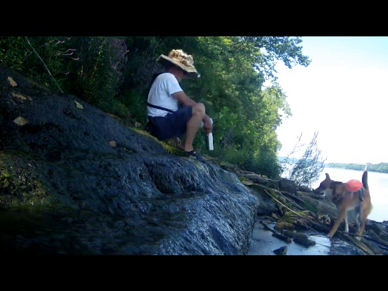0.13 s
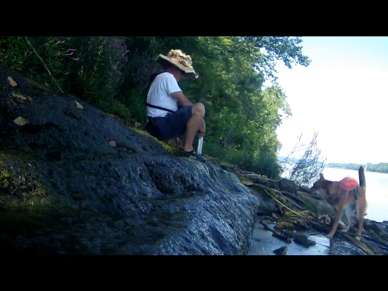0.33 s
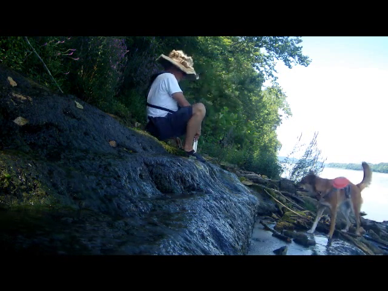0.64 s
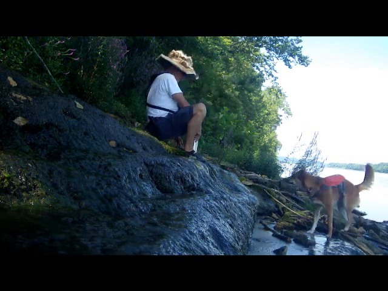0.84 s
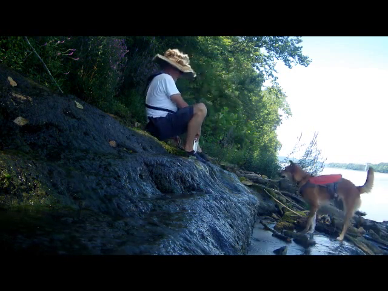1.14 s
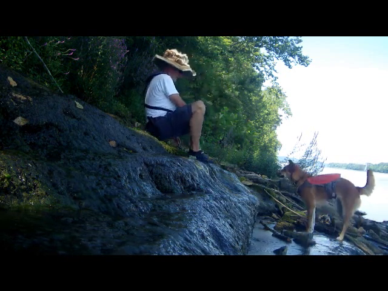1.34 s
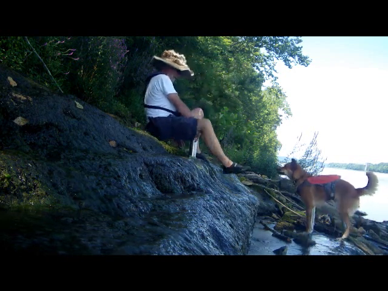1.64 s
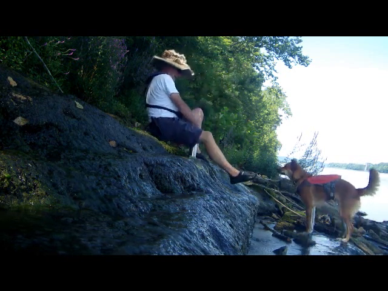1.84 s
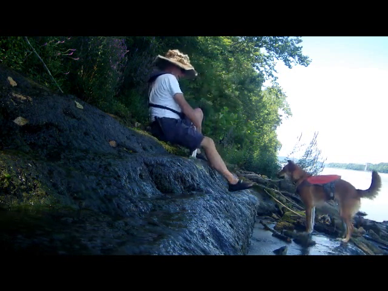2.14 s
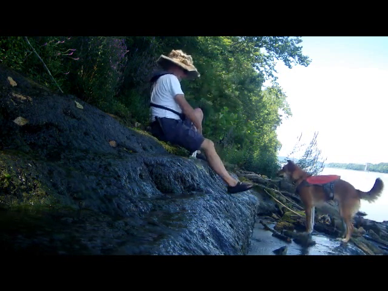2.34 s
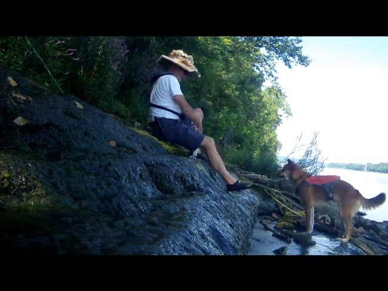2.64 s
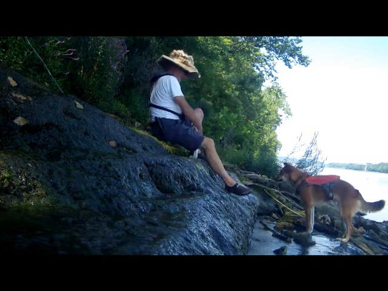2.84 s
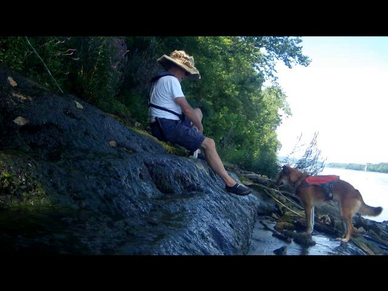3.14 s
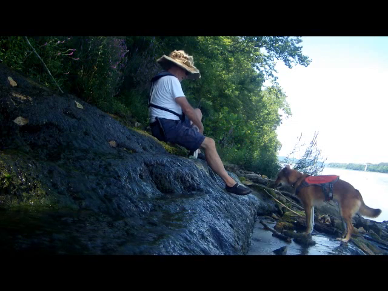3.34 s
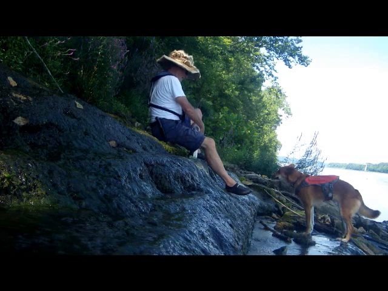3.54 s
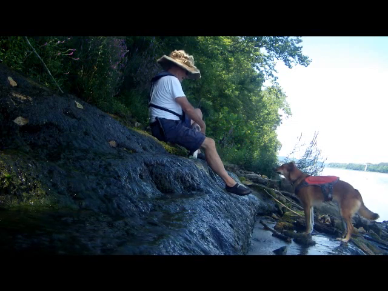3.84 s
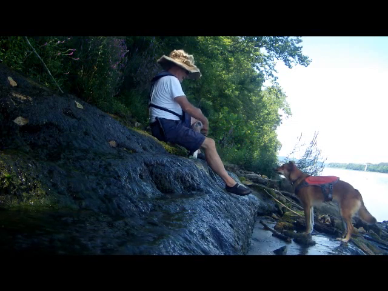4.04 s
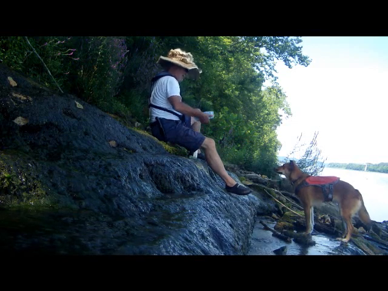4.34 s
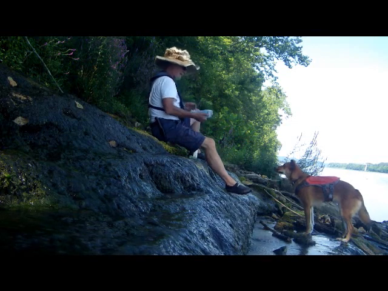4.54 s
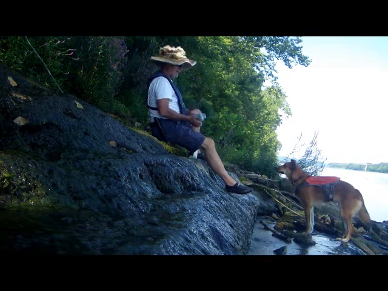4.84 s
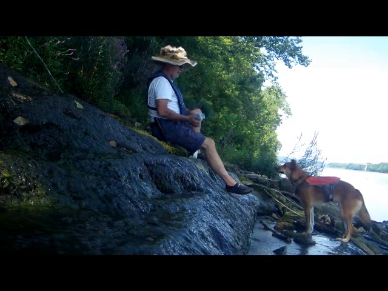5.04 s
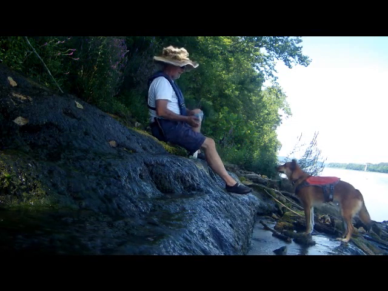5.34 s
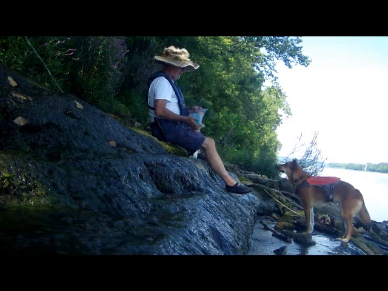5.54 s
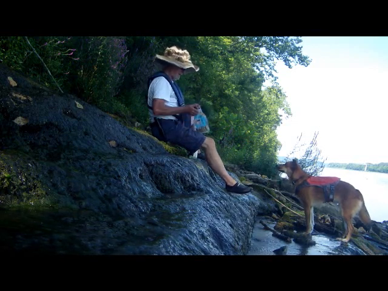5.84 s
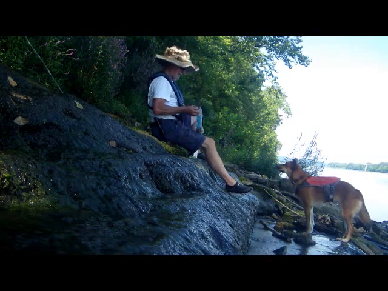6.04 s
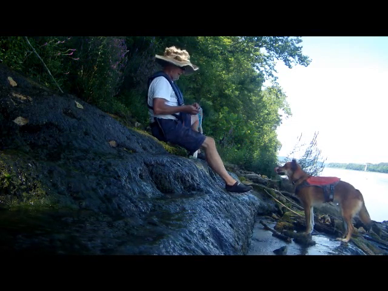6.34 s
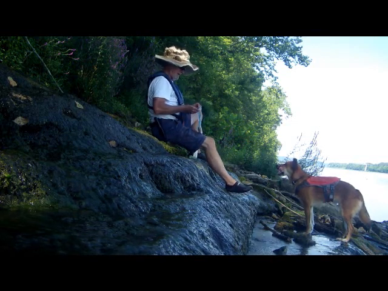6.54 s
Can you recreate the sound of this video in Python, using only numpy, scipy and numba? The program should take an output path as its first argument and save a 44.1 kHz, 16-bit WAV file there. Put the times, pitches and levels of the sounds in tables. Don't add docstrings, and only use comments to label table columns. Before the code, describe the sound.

Outdoors by a rock ledge, water keeps flowing with a crisp, flickering fizz and fine burble. Irregular single drops snap and ring at high pitch, mid-pitched bubbles gurgle, low bloops sit faintly underneath, and a few drops knock on stone. Some hits late on are the loudest and slightly clipped, pushing the flow down before it swells back. Small enclosed microphone, coloured and resonant, with little deep bass.

```python
import sys
import numpy as np
from scipy import signal
from scipy.fft import rfft, irfft
from scipy.io import wavfile
from scipy.ndimage import uniform_filter1d
from numba import njit

SR = 44100
rng = np.random.default_rng(int(sys.argv[2]) if len(sys.argv) > 2 else 0)


def level_to_linear(level):
    exponent = np.asarray(level, float) / 20
    return 10 ** exponent


def master_out(mix):
    frames = np.transpose(np.atleast_2d(mix))
    ceiling = np.clip(frames, -1, 1)
    pcm = np.round(ceiling * 32767).astype(np.int16)
    wavfile.write(sys.argv[1], SR, pcm)


N = 295470
T = np.arange(N) / SR
CASE_HZ = np.fft.rfftfreq(8192, 1 / SR)


def unit(x):
    return x / np.sqrt(np.mean(x ** 2))


def case_db():
    # f/Hz, level/dB
    broad_points = [(12, -64), (20, -41), (104, -38), (166, -37), (283, -34), (537, -13.5), (887, -27),
                    (1470, -0.5), (2560, -13.5), (3680, -10), (4470, -7.5), (6250, -9), (8980, -25.5),
                    (14000, -26.5), (15700, -27)]
    # f/Hz, width/Hz, level/dB
    ripples = [(162.3, 40, 6.5), (1993, 105, 3.5), (3660, 160, 1), (3710, 306, -4.5), (4780, 63, -9.5),
               (5855, 450, -5), (6270, 120, 3), (6560, 116, -7), (9810, 310, 4), (15100, 610, -9),
               (12960, 1900, -5.5), (1480, 300, 2.5), (15750, 400, -9)]
    # f/Hz, width/Hz, level/dB
    thin_notches = [(7418, 45, -16), (14835, 60, -9)]
    points_hz, points_db = np.transpose(broad_points)
    broad = np.interp(np.log(CASE_HZ + 1), np.log(points_hz), points_db)
    response = uniform_filter1d(broad, size=5)
    for group in (ripples, thin_notches):
        for hz, width_hz, db in group:
            response = response + db / (1 + (2 * (CASE_HZ - hz) / width_hz) ** 2)
    return response


def case(x):
    cepstrum = irfft(case_db() * np.log(10) / 20)
    cepstrum[1:4096] *= 2
    cepstrum[4097:] = 0
    response = irfft(np.exp(rfft(cepstrum)))
    return signal.fftconvolve(x, response)[:N]


def gain_db():
    # t/s, step down/dB
    overloads = [(0.106, 0.5), (0.34, 5.5), (0.781, 1.5), (1.175, 4), (1.265, 4), (1.676, 1.5), (2.153, 4),
                 (2.382, 6), (2.86, 4), (3.195, 2.5), (3.413, 0.5), (3.438, 2), (3.618, 3), (3.917, 4.5),
                 (4.121, 1), (4.138, 4), (4.603, 3), (4.835, 1.5), (4.848, 3), (5.234, 3), (5.314, 3.5),
                 (5.52, 8), (5.866, 6.5)]
    recovery_db_per_s = 14.5
    out = np.zeros(N)
    for s, step_db in overloads:
        i = int(s * SR)
        climbing = out[i] - step_db + recovery_db_per_s * (T[i:] - s)
        out[i:] = np.minimum(climbing, 0)
    return uniform_filter1d(out, size=60, origin=29)


@njit
def ring(start, hz, cycles, size, glide):
    out = np.zeros(N)
    for k in range(len(start)):
        period = SR / hz[k]
        phase = 0.
        for i in range(min(int(2 * cycles[k] * period), N - start[k])):
            age = 3 * i / period / cycles[k]
            phase += 2 * np.pi * (1 + glide[k] * age / 3) / period
            envelope = (age * np.exp(1 - age)) ** 1.5
            out[start[k] + i] += size[k] * envelope * np.sin(phase)
    return out


def walk(rate):
    k = int(SR / rate)
    levels = rng.standard_normal(N // 100)[:N // k + 1]
    slewed = uniform_filter1d(uniform_filter1d(np.repeat(levels, k), k), k)[:N]
    drift = uniform_filter1d(slewed, size=int(.11 * SR))
    return unit(slewed - drift)


def spray(shared_db, own_db):
    spectrum = rfft(rng.standard_normal(N))
    hz = np.fft.rfftfreq(N, 1 / SR)
    surge = walk(20) + 0.63 * walk(45)
    out = 0
    for octave in range(4, 15):
        share = np.cos(np.pi / 2 * np.clip(np.log2(hz + 1) - octave, -1, 1)) ** 2
        depth = np.clip((octave - 5.5) / 6, .1, 1.1)
        flicker_db = depth * (shared_db * surge + own_db * walk(30))
        out = out + irfft(spectrum * share, N) * level_to_linear(flicker_db)
    return unit(out)


def bubbles(count, low_hz, high_hz, cycles, spread_db, glide):
    when, pitch, luck, length = rng.random((count, 4)).T
    start = (when * N).astype(np.int64)
    hz = low_hz * (high_hz / low_hz) ** pitch
    size = hz / high_hz * level_to_linear(spread_db * np.minimum(-np.log(luck), 3.5))
    return unit(ring(start, hz, cycles * (.5 + length), size, glide * length))


def trickle():
    # t/s, level/dB
    flow = [(0, 0.5), (.25, -1.5), (.4, 2.1), (.7, 2.5), (.9, -1), (1.35, 4.5), (1.9, 0), (2.55, 3),
            (2.8, 0.5), (3.4, 2), (3.75, 0), (4.1, 3.5), (4.3, 1), (4.75, -0.5), (5.05, 1), (5.6, 1.5),
            (6.2, 3), (6.7, 1)]
    fizz = bubbles(count=20000, low_hz=2474, high_hz=12860, cycles=6.5, spread_db=4.5, glide=0.14)
    burble = bubbles(count=3000, low_hz=297.4, high_hz=2636, cycles=11.56, spread_db=2.0, glide=0.241)
    patter = bubbles(count=700, low_hz=1500, high_hz=6300, cycles=2.3, spread_db=-3.0, glide=0.17)
    water = spray(shared_db=0.74, own_db=0.32)
    water = water + level_to_linear(-4.0) * fizz + level_to_linear(-13.5) * burble + level_to_linear(-19.5) * patter
    water_db = -21 + np.interp(T, *np.transpose(flow))
    return unit(case(water)) * level_to_linear(water_db)


def lasting(table, *rest):
    return np.array([tuple(row) + rest for row in table], float)


def drops(table, glide):
    s, db, hz, cycles = np.transpose(table)
    swell_s = .0005
    start = ((s + swell_s) * SR).astype(np.int64)
    colour_db = np.interp(hz, CASE_HZ, uniform_filter1d(case_db(), size=60))
    size = level_to_linear(db - gain_db()[start] - colour_db)
    return ring(start, np.minimum(hz, 14000), np.clip(cycles, 1, 40), size, np.full(len(s), glide))


def bloops():
    # t/s, peak level as heard/dB, f/Hz
    low_bubbles = [(.711, -37, 530), (.797, -36, 538), (.985, -34.5, 540), (1.974, -35, 650),
                   (2.11, -34, 560), (3.16, -35.5, 520), (3.352, -35, 490), (3.54, -35, 600),
                   (4.65, -42, 487), (5.16, -34, 540), (5.944, -35, 570), (6.278, -37.5, 470),
                   (6.484, -29.5, 553)]
    return drops(lasting(low_bubbles, 8.6), glide=0.22)


def risers():
    # t/s, peak level as heard/dB, f/Hz, length/cycles
    climbers = [
        (0.52, -50, 614, 13),
        (1.293, -33.5, 660, 17),
        (1.37, -36, 700, 12),
        (6.54, -33, 983, 15.7),
    ]
    return drops(climbers, glide=0.524)


def gurgles():
    # t/s, peak level as heard/dB, f/Hz
    gurgling = [(.0147, -12.5, 1490), (.5395, -14, 1730), (.7736, -10.5, 1500), (1.172, -12, 1500),
                (1.3588, -18, 1500), (1.452, -15, 1500), (1.4717, -12.5, 1390), (1.5893, -18, 1570),
                (1.6256, -15, 1480), (1.949, -13.5, 1350), (2.135, -14.5, 1480), (2.6337, -18, 1540),
                (2.78, -14, 1740), (2.8609, -16, 1420), (3.3578, -16, 1460), (3.401, -15, 1560),
                (3.4244, -16, 1410), (4.08, -12.5, 1460), (4.1144, -13, 1480), (4.3251, -16.5, 1400),
                (4.4434, -16, 1440), (4.5301, -16.5, 1320), (4.598, -13, 1530), (4.8358, -10, 1620),
                (5.2594, -18, 1440), (6.433, -14, 1640), (6.4623, -18, 1660), (6.4712, -12.5, 1334),
                (6.635, -27, 1400), (6.6536, -12.5, 1370)]
    return drops(lasting(gurgling, 9.7), glide=0.028)


def spits():
    # t/s, peak level as heard/dB
    bursts = [(.3182, -25), (.7721, -26.5), (.9023, -20), (1.033, -22), (1.099, -24), (1.334, -25),
              (1.5604, -25), (2.3331, -24), (2.4785, -22), (2.5132, -19), (2.5655, -21), (2.814, -22),
              (3.0834, -16), (3.1363, -22.5), (3.291, -19.5), (3.4047, -24), (3.6002, -28), (3.7145, -23),
              (3.7484, -24), (3.9105, -26), (4.1865, -26), (4.2163, -24), (4.2567, -20.5), (4.578, -23),
              (4.7845, -25), (4.8275, -21.5), (5.1023, -21), (5.233, -11.5), (5.495, -25), (6.4642, -25)]
    s, db = np.transpose(bursts)
    late, detune = rng.random((len(s), 2, 4)).transpose(1, 2, 0)
    bright_db = -16
    out = 0
    for k, (hz, share_db) in enumerate([(8300, -1.5), (9900, -1), (11500, -4.5), (13400, 7)]):
        level_db = db + share_db + bright_db * (k == 3)
        burst_s = s + 0.0022 * late[k]
        burst_hz = hz * (0.867 + 0.19 * detune[k])
        rows = np.transpose([burst_s, level_db, burst_hz, np.full(len(s), 9.)])
        out = out + drops(rows, glide=0.079)
    return out


def smacks():
    # t/s, peak level as heard/dB
    knocks = [
        (.7794, -19),
        (.845, -14),
        (1.2606, -13),
        (1.6754, -13),
        (2.1498, -7.5),
        (3.411, -20),
        (3.9134, -22),
        (4.137, -9),
        (4.6, -10),
    ]
    return drops(lasting(knocks, 3600, 2.5), glide=.05)


def plops():
    # t/s, peak level as heard/dB, f/Hz
    falling = [(.174, -9, 4320), (.224, -9, 4440), (.3386, -9, 4960), (.6833, -11, 5150), (.8422, -6, 5570),
               (1.2014, -7.5, 4250), (1.2336, -9, 5260), (1.3397, -11, 4510), (1.3782, -10, 4170),
               (1.7673, -7, 4300), (2.1046, -7, 4400), (2.3827, -5, 4300), (2.8593, -4.5, 4450),
               (3.1907, -7, 4400), (3.4386, -9, 4730), (3.543, -11, 4430), (3.617, -7, 4200),
               (3.7813, -9, 5300), (4.12, -11, 4880), (4.347, -12, 4680), (4.4448, -8, 5000),
               (4.8469, -6, 4900), (5.098, -9, 4150), (5.31, -6.5, 4600), (5.3375, -14, 3870),
               (5.5186, -2.5, 4500), (5.8653, -3, 5200), (5.9209, -13.5, 4500), (6.433, -11.5, 5180),
               (6.558, -8, 4400)]
    fall_back_db = [-13, -15]
    rows = lasting(falling, 6.2)
    late, detune = rng.random((len(rows), 2, 2)).transpose(1, 2, 0)
    snaps = rows * [1, 1, 1.63, 0] + [0, -11, 0, 1.7]
    out = drops(rows, glide=0.022) + drops(snaps, glide=.05)
    gain = gain_db()
    for k, back_db in enumerate(fall_back_db):
        delay_s = 0.0014 + 0.0041 * late[k]
        shift_hz = 900 * (detune[k] - .5)
        droplets = rows + np.transpose([delay_s, back_db + 0 * late[k], shift_hz, 3 * late[k]])
        droplets[:, 1] += np.interp(droplets[:, 0], T, gain) - np.interp(rows[:, 0], T, gain)
        out = out + drops(droplets, glide=0.094)
    return out


def scene():
    steady = trickle()
    small = plops() + spits() + smacks()
    large = gurgles() + bloops() + risers()
    return (steady + case(small + large))[None]


def low_pass(x):
    return signal.sosfilt(signal.butter(12, 15830, fs=SR, output="sos"), x)


def record(dry):
    ceiling = .45
    gained = dry * level_to_linear(gain_db())
    shaved = gained - np.clip(gained, -ceiling, ceiling)
    above_bass = signal.butter(2, 900, "high", fs=SR, output="sos")
    clipped = gained - signal.sosfilt(above_bass, shaved)
    roll_off = signal.butter(8, 15250, fs=SR, output="sos")
    rolled = signal.sosfilt(roll_off, clipped)
    steep_edge = signal.ellip(10, .3, 60, 15770, fs=SR, output="sos")
    mix = signal.sosfilt(steep_edge, rolled)
    return low_pass(mix)


dry = scene()
out = record(dry)
master_out(out)
```